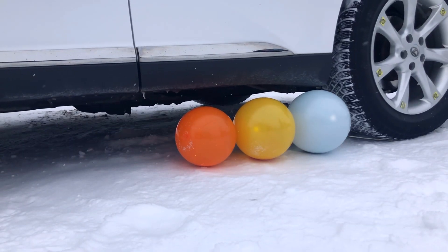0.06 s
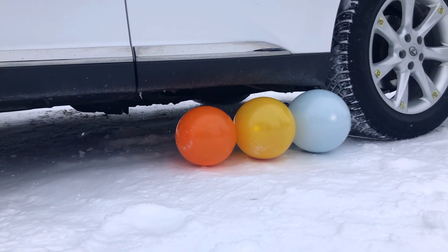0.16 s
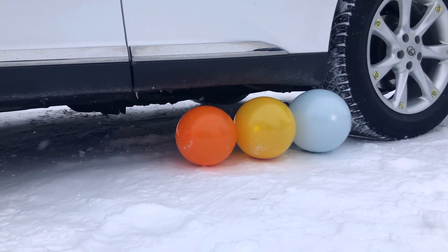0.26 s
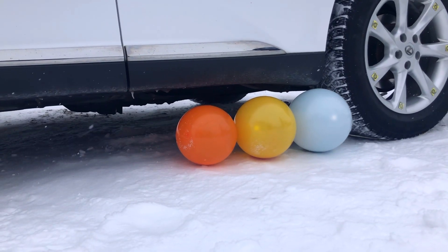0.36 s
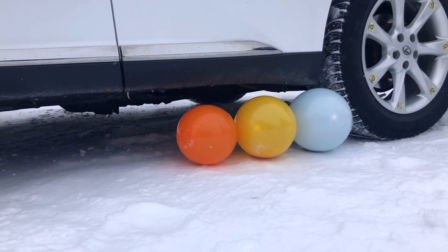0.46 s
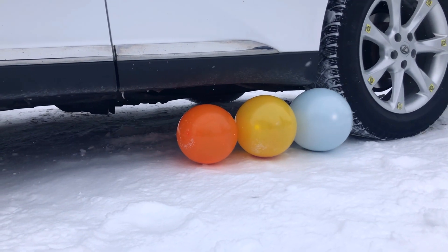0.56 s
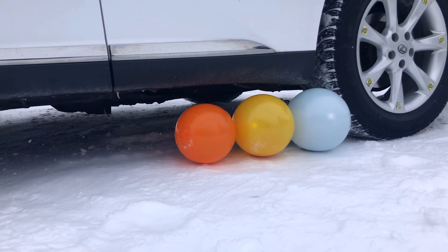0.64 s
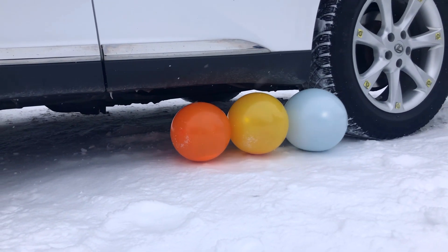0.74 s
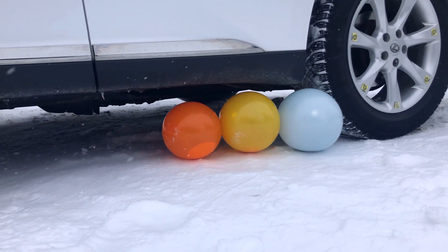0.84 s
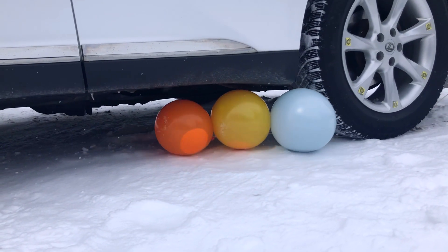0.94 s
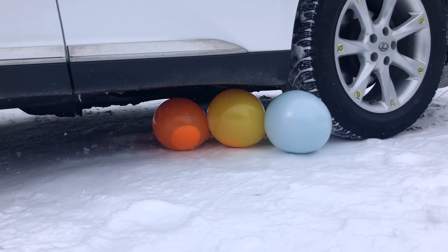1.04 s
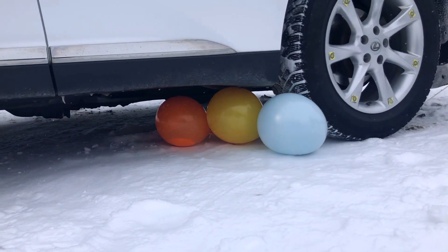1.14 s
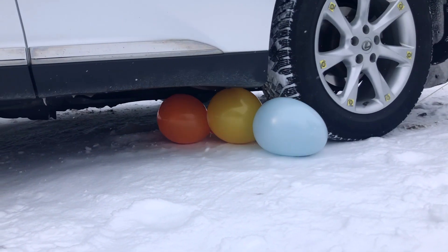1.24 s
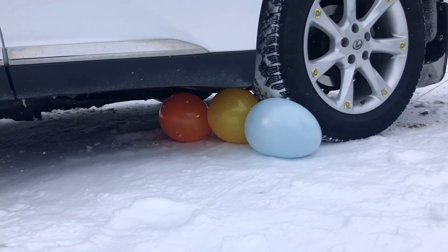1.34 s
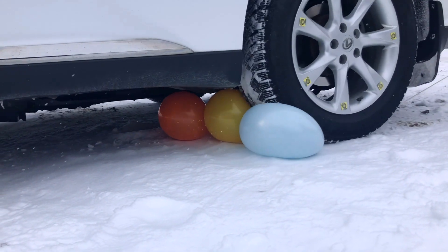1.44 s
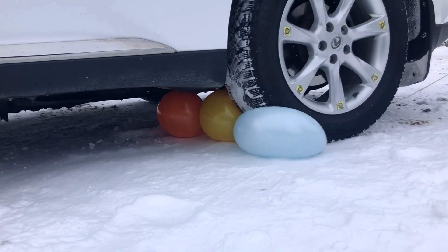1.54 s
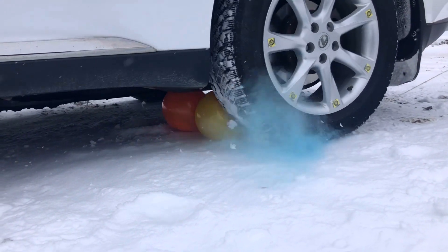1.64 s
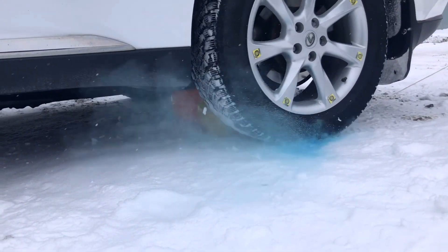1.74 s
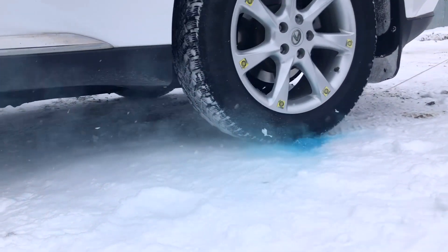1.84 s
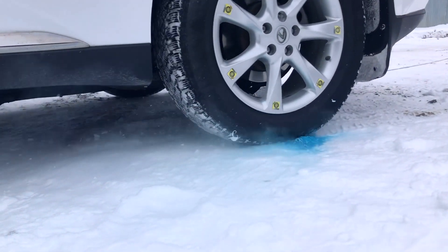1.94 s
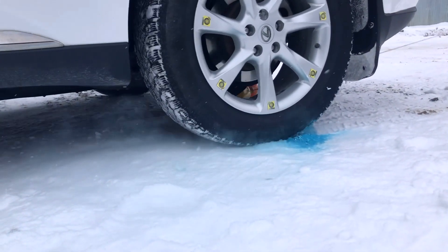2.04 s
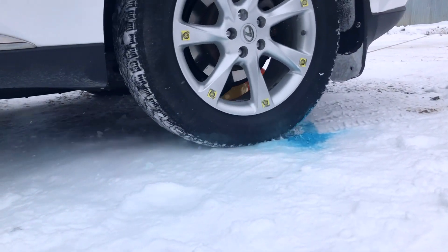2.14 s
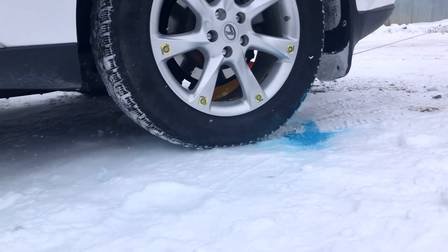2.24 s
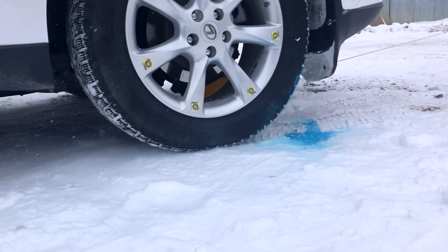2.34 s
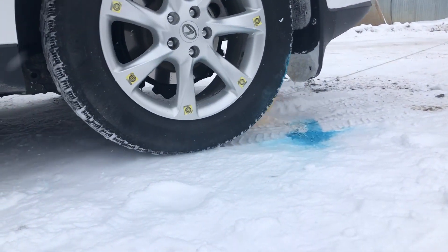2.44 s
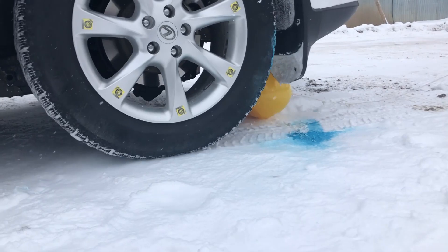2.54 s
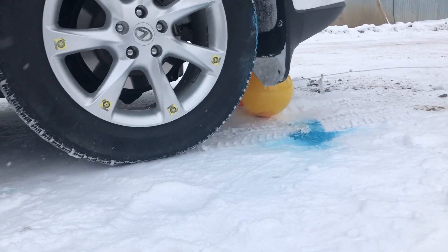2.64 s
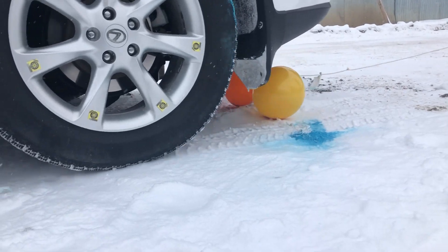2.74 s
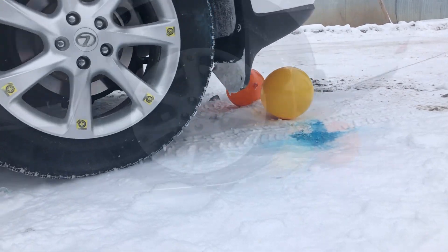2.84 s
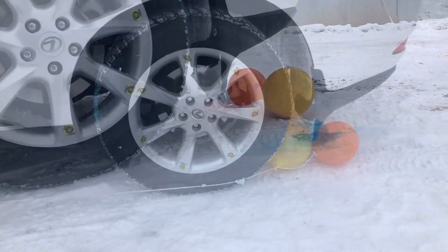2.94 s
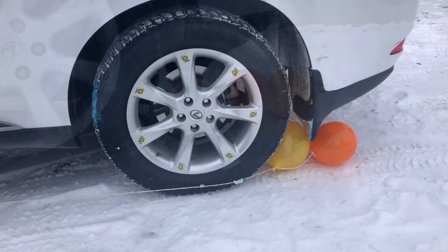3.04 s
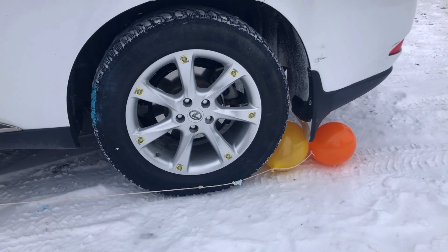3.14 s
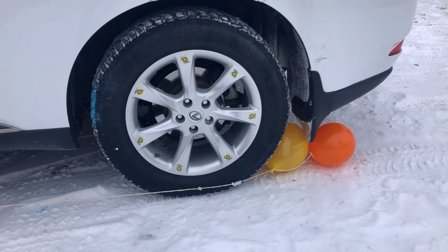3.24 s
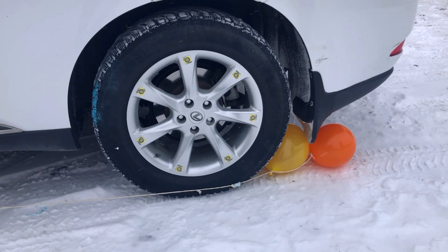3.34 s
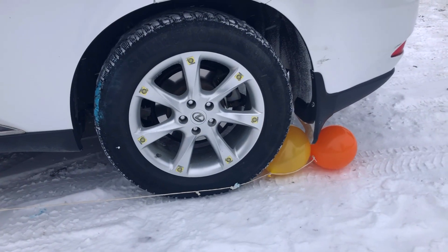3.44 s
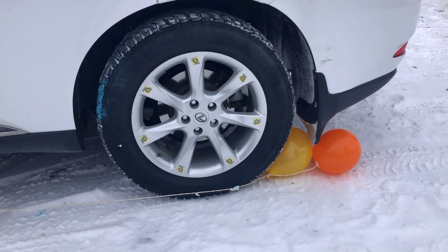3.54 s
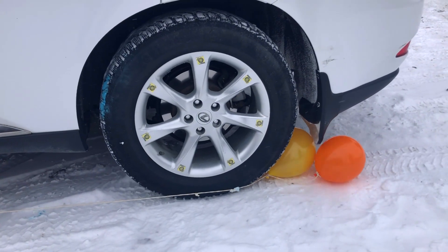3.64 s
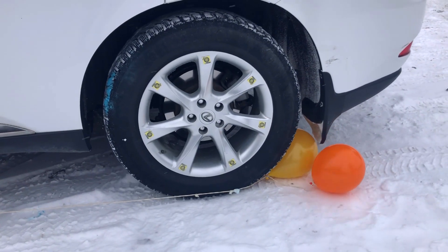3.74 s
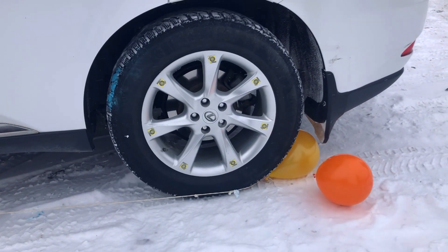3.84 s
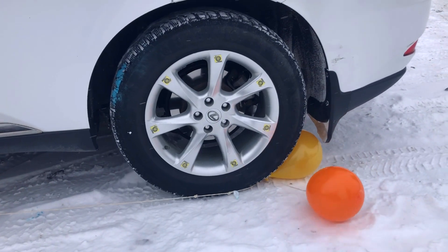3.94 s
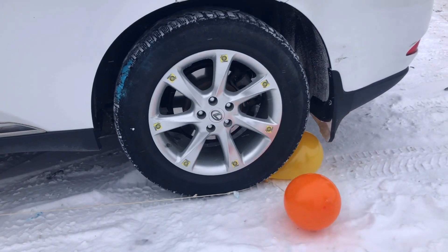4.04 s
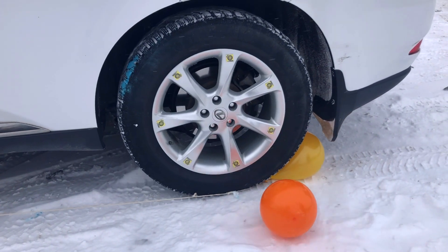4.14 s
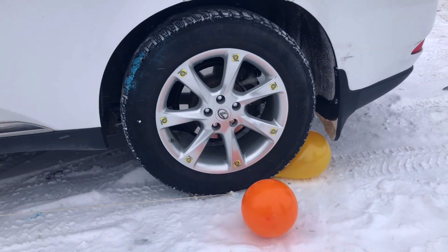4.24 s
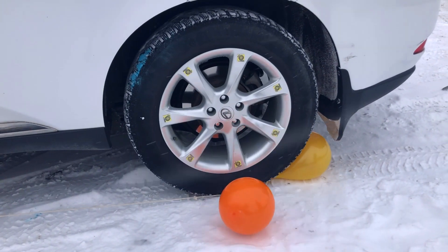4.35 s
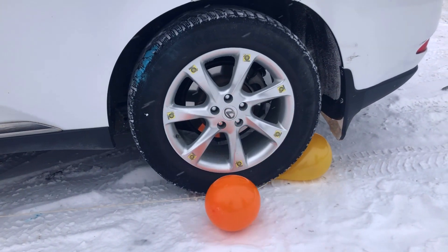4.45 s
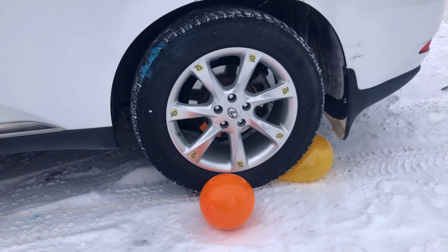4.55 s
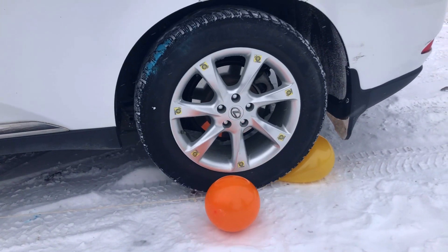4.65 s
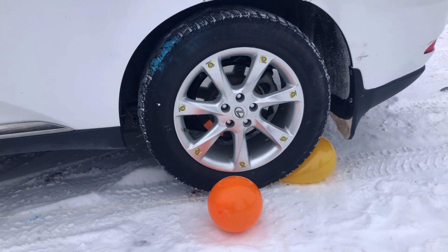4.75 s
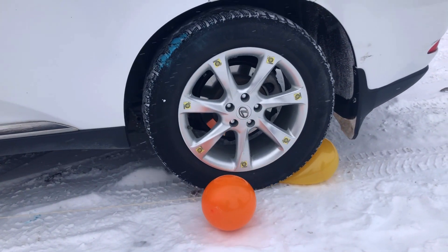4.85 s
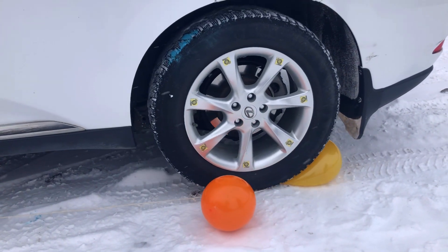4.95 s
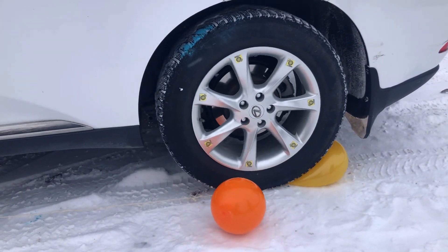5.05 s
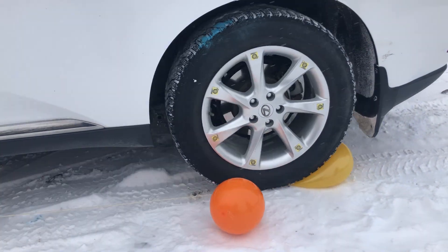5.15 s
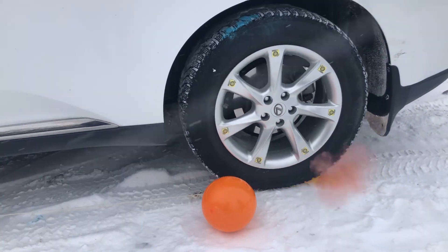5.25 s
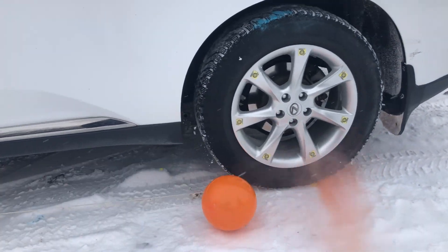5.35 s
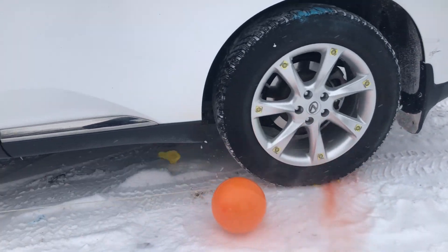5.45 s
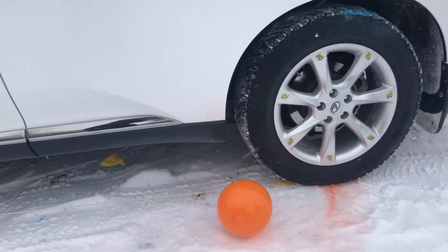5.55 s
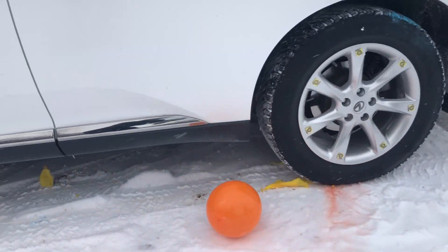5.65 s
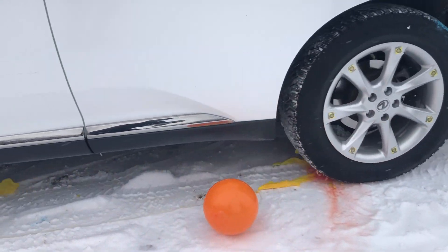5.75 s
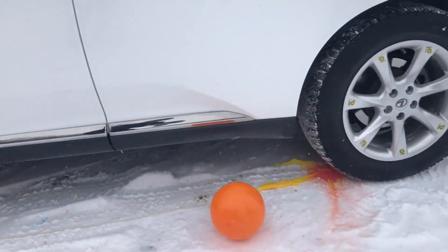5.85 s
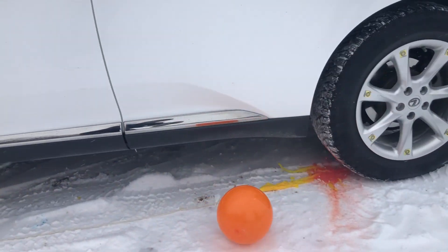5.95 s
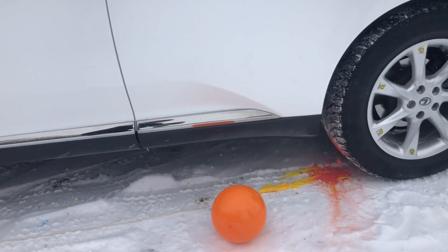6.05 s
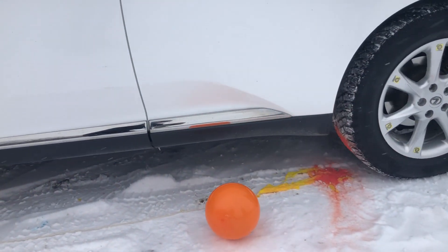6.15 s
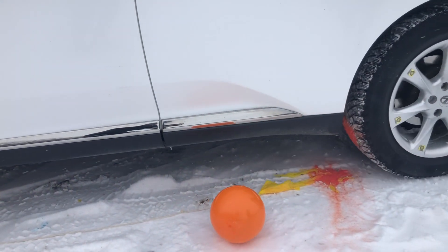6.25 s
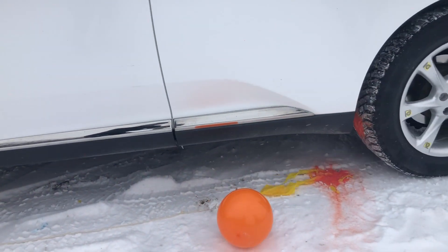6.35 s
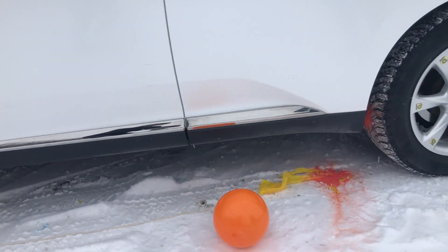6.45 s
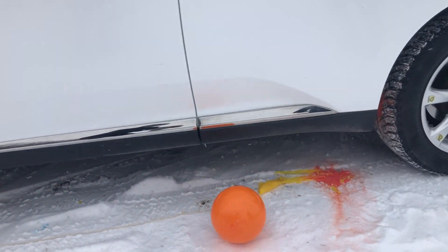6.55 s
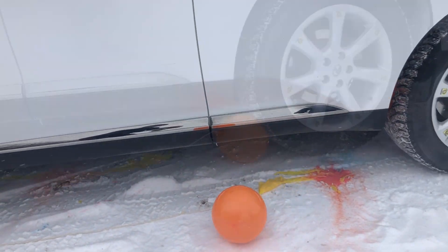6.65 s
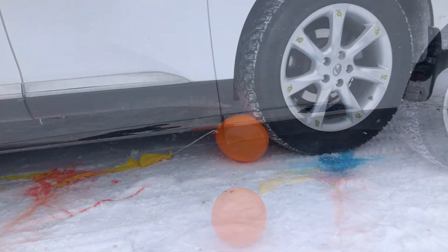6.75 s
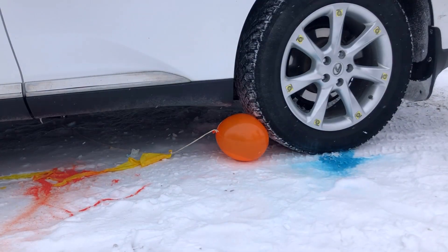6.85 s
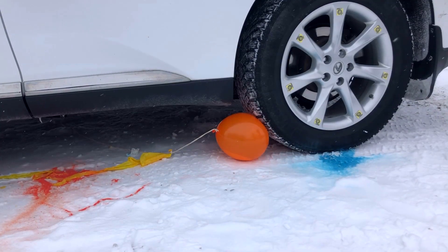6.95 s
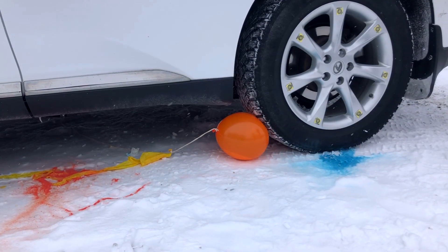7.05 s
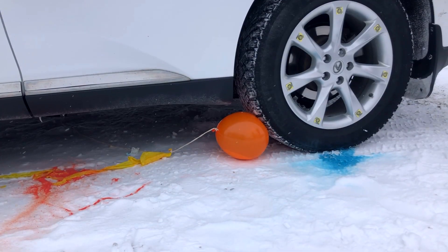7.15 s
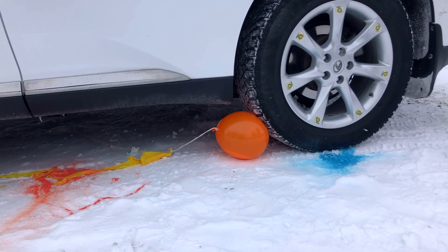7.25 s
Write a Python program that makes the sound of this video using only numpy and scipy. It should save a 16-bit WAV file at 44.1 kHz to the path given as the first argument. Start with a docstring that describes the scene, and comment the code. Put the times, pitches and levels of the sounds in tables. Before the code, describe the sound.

Close outdoor sound of a car tyre rolling slowly over packed snow, with low rumble and grainy crunches. Balloons burst in a tight run of sharp, hollow booms with slapping rubber and a brief squeal. A quiet engine hum follows, then the tyre lurches with thumps and ticking studs, and two more loud bursts crack, slightly overloaded. It ends on faint crunching and soft idling.

```python
"""Balloons burst under the tyre of a car rolling slowly over packed snow, out in the open. Each burst is a
falling boom with a crack of filtered noise; slapping, squeaking and squealing rubber joins in. Around the tyre,
snow crunches and thumps as falling rings, studs tick in short noise and metal clinks in modes. Behind it lie
snow grains, rumble and hiss of shaped noise, and an engine idling in wavering sines. The whole sound fades out
and in briefly at five moments and fades out at its very end; the loudest bursts are softly overloaded."""
import sys
import numpy as np
from scipy import signal
from scipy.fft import rfft, irfft, next_fast_len
from scipy.io import wavfile
from scipy.ndimage import uniform_filter1d

SR = 44100
rng = np.random.default_rng(int(sys.argv[2]) if len(sys.argv) > 2 else 0)


def dump_mix(stems):
    """Bounce the given channels to the path in sys.argv[1] as a 16-bit WAV at rate SR."""
    frames = np.atleast_2d(stems).T  # one column per channel
    limited = np.clip(frames, -1, 1)  # hard clip at full scale
    pcm = np.round(limited * 32767).astype(np.int16)
    wavfile.write(sys.argv[1], SR, pcm)


N = 321753
T = np.arange(N) / SR  # seconds


def gain_of(db):
    """Decibels to amplitude."""
    return 10 ** (np.asarray(db) / 20)


def evened(x):
    """Scales to rms 1."""
    return x / np.sqrt(np.mean(x ** 2) + 1e-20)


def wander(size):
    """Slow random drift of rms 1: noise averaged over size samples."""
    return evened(uniform_filter1d(rng.standard_normal(N), size=size))


def along(rows):
    """The columns of a curve, interpolated at every sample."""
    s, *columns = np.transpose(rows)
    return [np.interp(T, s, c) for c in columns]


def colour(x, points):
    """Filters x by a spectrum of (Hz, dB) points, rms 1."""
    hz, db = np.transpose(points)
    size = next_fast_len(N)
    log_hz = np.log(np.fft.rfftfreq(size, 1 / SR) + 1)
    response = gain_of(np.interp(log_hz, np.log(hz + 1), db, -90, -90))
    return evened(irfft(rfft(x, size) * response, size)[:N])


def band(x, low_hz, high_hz):
    """Band-pass of rms 1."""
    edges = [low_hz, min(high_hz, 20000)]
    sos = signal.butter(N=2, Wn=edges, btype="band", fs=SR, output="sos")
    return evened(signal.sosfilt(sos, x))


def add(mix, s, sound):
    """Mixes a sound in at s seconds."""
    part = mix[round(s * SR):][:len(sound)]
    part += sound[:len(part)]


def chirp(start_hz, end_hz, glide, t60, rise, hold=1):
    """A dying ring, peak 1, whose pitch drops as the struck thing slackens; times in seconds."""
    t = np.arange(int(t60 * SR) + 8) / SR
    hz = end_hz + (start_hz - end_hz) * np.exp(-t / glide)
    decay = gain_of(-60 * (t / t60) ** hold)  # hold above 1 keeps it loud, then cuts it short
    ring = np.sin(2 * np.pi * np.cumsum(hz) / SR) * decay * (1 - np.exp(-t / rise))
    return ring / abs(ring).max()


# The engine idling. Each row: time in seconds, firing rate in Hz, level in dB before the order levels.
IDLE_CURVE = [(2.75, 30.26, -58), (3.0, 30.34, -41.5), (4.2, 29.61, -44), (4.65, 28.77, -42.5),
              (4.8, 29.78, -69), (6.601, 27.67, -75), (6.9, 26.76, -47), (7.3, 27, -43.5)]
# Its audible orders. Each row: multiple of the firing rate, level in dB relative to the idle.
ENGINE_ORDERS = [(2, -5.5), (4, -5), (4.5, -8.5), (5, 1.5)]
# Steady thin tones of the accessories. Each row: start and end in seconds, pitch in Hz, level in dB.
ACCESSORY_WHINES = [(2.9, 4.6, 890, -63), (2.9, 4.6, 1440, -59), (2.9, 4.6, 2028, -64.5),
                    (2.9, 4.2, 9400, -72), (0, .35, 9550, -75)]


def engine():
    """Wavering multiples of the firing rate and the thin whines of the accessories."""
    firing_hz, idle_db = along(IDLE_CURVE)
    turns = np.cumsum(firing_hz) / SR
    out = np.zeros(N)
    for multiple, order_db in ENGINE_ORDERS:
        waver_db = 2.3 * wander(5000)
        tone = np.sin(2 * np.pi * (multiple * turns + rng.random()))
        out += gain_of(idle_db + order_db + waver_db) * tone
    for start, end, hz, db in ACCESSORY_WHINES:
        drift = np.cumsum(rng.standard_normal(N)) * .009  # turns
        on = np.clip(np.minimum(T - start, end - T) / 0.27 + .5, 0, 1)  # fades over 0.27 s
        out += gain_of(db) * on * np.sin(2 * np.pi * (hz * T + drift))
    return out


# Level of the engine hiss. Each row: time in seconds, level in dB before brightening,
# gain in dB of its treble, roughly above 5 kHz.
HISS_CURVE = [(0, -53.5, -8), (.6, -52.5, -13), (.62, -63.5, 16.5), (1.2, -63, 25), (1.4, -68, 30),
              (1.64, -53, 25.5), (1.75, -55, 5), (1.8, -46.5, -15.5), (2.0, -63.5, -13.5),
              (2.4, -64.5, 1.5), (2.9, -54.5, -10.5), (3.3, -50, -8.5), (4.75, -50.5, -5.5),
              (4.95, -61, -1), (5.15, -53.5, -7), (5.25, -56.5, 2), (5.37, -55.5, -6), (5.4, -62.5, 16.5),
              (5.55, -73.5, -14), (6.65, -66.5, -5), (6.67, -56, -31.5), (7.3, -57.5, -36)]
# Tone of the engine hiss. Each row: frequency in Hz, relative level per Hz in dB.
HISS_SPECTRUM = [(710, -21.5), (1200, -2), (1460, -1), (1820, -7), (1970, -9), (2290, -6.5), (15100, -25),
                 (15800, -30), (16100, -71)]


def engine_hiss():
    """Shaped noise whose level flickers and whose treble is raised or lowered apart."""
    level_db, bright_db = along(HISS_CURVE)
    hiss = colour(rng.standard_normal(N), HISS_SPECTRUM) * gain_of(wander(1200))
    treble = hiss - signal.lfilter([.5], [1, -.5], hiss)
    return gain_of(level_db) * (hiss + (gain_of(bright_db) - 1) * treble)


# Share of separate grains in the snow sound. Each row: time in seconds, share by power from 0 to 1.
GRAIN_SHARE = [(0, 0.65), (.7, .7), (1.9, 0.3), (2.85, 0.7), (3.1, 0.28), (4.6, 0.05), (4.8, 0.45),
               (5.7, .55), (6.75, 0.75), (6.95, 0.35)]
# Tone of the snow under the tyre. Each row: frequency in Hz, relative level per Hz in dB.
SNOW_SPECTRUM = [(76, -26), (130, -12.5), (421, -12), (717, -18), (842, -20), (1110, -23.5), (1600, -30.5),
                 (2000, -37), (3250, -87)]


def snow_grains():
    """Crystal bonds snap with falling pitches among smooth noise, shaped to the tone of snow."""
    strengths = gain_of(3.4 * np.minimum(rng.exponential(1, N), 3))
    snaps = strengths * (rng.random(N) < 400 / SR)  # about 400 a second
    kind, grains = rng.integers(0, 12, N), np.zeros(N)
    for k, hz in enumerate(np.geomspace(200, 1100, num=12)):
        snap = chirp(1.21 * hz, hz, 0.002, 9 / hz, 0.0021)
        grains += signal.oaconvolve(snaps * (kind == k), snap)[:N]
    # flatten the grains' own spectrum before colouring them
    power = uniform_filter1d(abs(rfft(grains)) ** 2, size=400)
    grains = irfft(rfft(grains) / np.sqrt(power + 1e-9), N)
    share = np.clip(along(GRAIN_SHARE)[0], 0, 1)
    smooth = colour(rng.standard_normal(N), SNOW_SPECTRUM)
    return np.sqrt(share) * colour(grains, SNOW_SPECTRUM) + np.sqrt(1 - share) * smooth


# The rolling tyre between lurches. Each row: time in seconds, snow level in dB, rumble level in dB.
ROLL_CURVE = [(0, -64.5, -30.5), (.07, -41.5, -42.5), (.12, -38, -34), (.3, -32.5, -35.5), (.6, -39.5, -38),
              (1.14, -37, -40), (1.2, -40, -44), (1.32, -36.5, -38), (1.45, -34.5, -28.5),
              (1.7, -30, -26.5), (1.77, -51, -45), (2.0, -48, -63), (2.45, -46.5, -58), (2.65, -44, -48.5),
              (2.95, -40.5, -48), (3.2, -46.5, -44), (4.62, -45, -49), (4.9, -42, -31), (5.2, -41, -29.5),
              (5.36, -36, -31.5), (5.57, -52, -48), (6.2, -49, -43), (6.5, -40.5, -36.5), (6.83, -43, -39),
              (6.92, -51, -46), (7.3, -52, -41.5)]
# The tyre lurching over a ridge of snow. Each row: time of the peak in seconds, length in seconds,
# change of the snow level in dB, change of the rumble level in dB.
RIDGE_LURCHES = [(2.307, 0.14, 4.5, -0.5), (2.793, 0.056, 4, -5), (3.274, 0.055, 4, 12.5),
                 (4.73, 0.16, 4.5, 17), (4.938, 0.092, 0.5, 4), (5.3, 0.23, 6.5, 8.5), (5.501, 0.092, 6, 4),
                 (5.878, 0.28, 3.5, 7)]
# Tone of the rumble. Each row: frequency in Hz, relative level per Hz in dB.
RUMBLE_SPECTRUM = [(20, -22.5), (40, 5), (80, 8), (134, 7.5), (206, 3), (320, -6), (420, -40)]


def rolling():
    """Snow grains and low rumble change level as the tyre lurches and as its tread rides unevenly."""
    snow_db, rumble_db = along(ROLL_CURVE)
    for s, length, crush_db, boom_db in RIDGE_LURCHES:
        swell = np.interp(T, [s - length / 2, s, s + length / 2], [0, 1, 0])
        snow_db = snow_db + crush_db * swell
        rumble_db = rumble_db + boom_db * swell
    uneven = evened(uniform_filter1d(wander(900), size=900))
    lumps = gain_of(2.44 * uneven)
    rumble = evened(colour(rng.standard_normal(N), RUMBLE_SPECTRUM) * lumps)
    return gain_of(snow_db) * snow_grains() * lumps ** 0.54 + gain_of(rumble_db) * rumble


# A small piece of metal struck. Each row: start in seconds, peak level in dB.
METAL_TAPS = [(0.041, -37), (0.078, -29.5)]
# Modes of the metal. Each row: frequency in Hz, relative level in dB, 60 dB decay in seconds.
METAL_MODES = [(1860, -12, 0.041), (2280, -3.5, 0.033), (3180, -2.5, 0.032), (4440, -1.5, 0.012)]


def clinks():
    """Two light taps ring the same few modes."""
    out, t = np.zeros(N), np.arange(4000) / SR
    ring = sum(gain_of(db - 60 * t / t60) * np.sin(2 * np.pi * hz * t) for hz, db, t60 in METAL_MODES)
    for s, db in METAL_TAPS:
        add(out, s, gain_of(db) * ring / abs(ring).max())
    return out


# Studs meeting ice. Each row: start in seconds, peak level in dB.
STUD_TICKS = [(0.043, -40), (0.08, -39), (1.534, -29), (1.547, -14.5), (4.815, -40), (4.8628, -51),
              (4.906, -46), (4.94, -35.5), (5.01, -31), (5.029, -41), (5.0474, -26), (5.131, -30.5),
              (5.1866, -55), (5.221, -52), (5.261, -43), (5.395, -36.5), (5.7695, -55), (5.7983, -53.5),
              (5.8157, -50), (5.823, -57.5), (5.967, -54), (6.0294, -50), (6.1056, -53), (6.141, -51),
              (6.161, -55), (6.178, -52.5), (6.246, -49), (6.3366, -64), (6.36, -57), (6.3734, -50.5),
              (6.388, -51), (6.441, -50.5), (6.478, -50.5), (6.487, -53.5), (6.5405, -50), (6.62, -54)]
# Further studs at random. Each row: time in seconds, typical peak level in dB.
STUD_PATTER = [(4.75, -92), (4.9, -42.5), (5.5, -53), (5.7, -68), (6.1, -65), (6.6, -56), (6.7, -88.5)]


def studs():
    """Short treble ticks: the listed ones on time, others scattered at random in clumps."""
    out, t = np.zeros(N), np.arange(400) / SR
    shape = t * np.exp(-t / 0.0002)
    ticks = [shape * band(rng.standard_normal(400), 2800, 11500) for _ in range(56)]
    ticks = [tick / abs(tick).max() for tick in ticks]
    for (s, db), tick in zip(STUD_TICKS, ticks):
        add(out, s, gain_of(db) * tick)
    clumps = gain_of(6 * wander(1500))
    hits = rng.random(N) < 90 * clumps / SR  # 90 a second, thickened and thinned by the clumps
    patter = gain_of(along(STUD_PATTER)[0] + 3.5 * rng.standard_normal(N)) * hits
    kind = rng.integers(0, 8, N)  # the last eight ticks serve the patter
    return out + sum(signal.oaconvolve(patter * (kind == k), ticks[-1 - k])[:N] for k in range(8))


# Lumps of snow giving way. Each row: start in seconds, peak level in dB,
# nominal pitch in Hz that the fall passes through.
SNOW_CRUNCHES = [(0.249, -29, 563), (0.261, -32, 645), (0.287, -38, 405), (0.312, -21, 390),
                 (0.387, -20, 520), (0.443, -26, 487), (0.456, -21.5, 634), (0.572, -29, 600),
                 (0.603, -28.5, 533), (0.682, -24.5, 410), (0.842, -22, 382), (1.048, -19.5, 410),
                 (1.099, -25.5, 400), (1.193, -23.5, 480), (2.514, -32, 416), (2.555, -34.5, 459),
                 (2.782, -30.5, 660), (2.842, -30.5, 430), (3.272, -31, 420), (4.28, -33, 850),
                 (4.708, -33, 392), (4.77, -21, 328), (5.001, -37, 700), (5.11, -29, 590),
                 (5.266, -31, 520), (5.303, -19.5, 597)]
# The tyre dropping through the crust. Each row: start in seconds, peak level in dB,
# nominal pitch in Hz that the fall passes through.
CRUST_THUMPS = [(1.126, -25.5, 181), (4.715, -22.5, 139), (4.736, -17, 160), (4.968, -20, 97),
                (5.212, -21.5, 142), (5.26, -23, 115.5), (6.24, -23.5, 89.8), (6.288, -26.5, 126),
                (6.453, -25.5, 122), (6.511, -27.5, 105), (6.604, -23, 151), (6.628, -21.5, 104)]
# The tyre scuffing sideways. Each row: start in seconds, length in seconds, level in dB before the swell.
TYRE_SCRAPES = [(5.815, .12, -56)]


def tread():
    """Crunches and thumps are falling rings as snow gives way; scrapes are swelling bands of sparse grit."""
    out = np.zeros(N)
    for s, db, hz in SNOW_CRUNCHES:
        add(out, s, gain_of(db) * chirp(2.93 * hz, 0.66 * hz, 0.0012, 11 / hz, 0.00098))
    for s, db, hz in CRUST_THUMPS:
        add(out, s, gain_of(db) * chirp(2.52 * hz, 0.73 * hz, 0.0031, 8 / hz, 0.00051))
    low_hz, high_hz = 1180, 1960
    for s, length, db in TYRE_SCRAPES:
        grit = rng.standard_normal(12000) * (rng.random(12000) < .02)
        scuff = band(band(grit, low_hz, high_hz), low_hz, high_hz)[:round(length * SR)]
        add(out, s, gain_of(db) * scuff * np.hanning(len(scuff)))
    return out


# A burst skin dragged under the tread while a loose flap of it beats. Each row: time in seconds,
# mean slip rate in Hz, level in dB of the tone before the flap, flap rate in Hz, flap depth from 0 to 1.
SQUEAL_CURVE = [(1.758, 790, -54, 640, 1), (1.778, 850, -34, 530, 1), (1.795, 820, -29, 470, .9),
                (1.812, 795, -29, 280, 1), (1.825, 755, -34, 250, .6), (1.843, 805, -34.5, 200, .15),
                (1.853, 795, -46, 200, .15), (1.869, 792, -34.5, 230, .1), (1.893, 780, -56, 260, .1)]


def squeal():
    """Slips with uneven timing, beaten by the flap into sidebands, with a rasp as long as the flap is loose."""
    start, end = SQUEAL_CURVE[0][0], SQUEAL_CURVE[-1][0]
    span = slice(round(start * SR), round(end * SR))
    hz, db, flap_hz, depth = (c[span] for c in along(SQUEAL_CURVE))
    noise = rng.standard_normal((2, len(hz)))
    uneven = evened(uniform_filter1d(noise[0], size=150))
    turns = np.cumsum(hz * (1 + .05 * depth * uneven)) / SR
    flap = np.sin(2 * np.pi * np.cumsum(flap_hz) / SR)
    tone = evened(sum(np.sin(2 * np.pi * k * turns) / k ** 1.7 for k in range(1, 8)))
    rasp = band(noise[1], 250, 1500) + .35 * band(noise[1], 1500, 4500)
    loose = tone * flap + gain_of(1) * flap + gain_of(-8) * rasp
    return start, gain_of(db) * (tone + depth * loose)


# Rubber sticking and slipping. Each row: start in seconds, length in seconds, level in dB at the swell's top,
# slip rate at the start and at the end in Hz, roughness from 0 to 1, frequency in Hz above which it is dull.
RUBBER_SQUEAKS = [(.915, .026, -27, 532, 530, .02, 600), (1.226, .03, -22, 262, 288, .04, 640),
                  (5.408, .035, -48, 2150, 1950, .6, 2000), (6.83, .18, -57, 1960, 1820, .45, 2000)]


def squeaks():
    """Regular slips give a harmonic tone; rough ones smear it into a rasp."""
    out = np.zeros(N)
    for s, length, peak_db, from_hz, to_hz, rough, dull_hz in RUBBER_SQUEAKS:
        done = np.arange(0, 1, 1 / (length * SR))
        db = peak_db - 27 * (2 * done ** 0.86 - 1) ** 2  # swells a little before the middle
        hz = from_hz + (to_hz - from_hz) * done
        turns = np.cumsum(hz) / SR
        tone = sum(np.sin(2 * np.pi * k * turns) / (1 + (k * hz / dull_hz) ** 6) for k in range(1, 8))
        noise = rng.standard_normal(8000)[:len(done)]
        rasp = band(noise, 0.85 * to_hz, 1.1 * from_hz)
        rough = np.clip(rough, 0, 1)
        add(out, s, gain_of(db) * (np.sqrt(1 - rough) * evened(tone) + np.sqrt(rough) * evened(rasp)))
    return out


def boom(s, db, end_hz, ring):
    """A falling ring of released air, torn ragged by noise; returns its start and sound."""
    ragged = band(rng.standard_normal(8000), 0.2 * end_hz, 1.4 * end_hz)[:len(ring)]
    return s, gain_of(db) * ring * (1 + 0.3 * ragged)


# Dull slaps of rubber around the bursts. Each row: start in seconds, level in dB before raggedness,
# end pitch in Hz, 60 dB decay in seconds.
RUBBER_SLAPS = [(1.358, -31, 326, 0.0068), (1.3617, -10.5, 384, 0.0076), (1.3675, -7, 264, 0.015),
                (1.381, -17, 98, 0.043), (1.6579, -2.5, 193, 0.012), (1.664, -15, 100, 0.019),
                (5.059, -9, 224, 0.0074), (5.066, -16, 459, 0.013), (5.0725, -6, 116.5, 0.02),
                (5.3042, -9, 149, 0.021), (5.35, -27, 466, 0.042)]


def slaps():
    """Booms alone, each falling from twice its end pitch."""
    out = np.zeros(N)
    for s, db, hz, t60 in RUBBER_SLAPS:
        ring = chirp(2 * hz, hz, glide=0.0044, t60=t60, rise=0.00078, hold=2.6)
        add(out, *boom(s, db, hz, ring))
    return out


# The skin tearing further. Each row: start in seconds, level in dB before its decay.
SKIN_RIPS = [(1.3503, -21.5), (1.355, -27.5), (1.3715, -28)]


def rips():
    """Tearing rubber as decaying bands of noise."""
    out, t = np.zeros(N), np.arange(3000) / SR
    for s, db in SKIN_RIPS:
        decay = gain_of(db - 60 * t / 0.022)
        add(out, s, decay * band(rng.standard_normal(len(t)), 900, 5100) * np.minimum(t / 0.00044, 1))
    return out


# The balloons bursting. Each row: start in seconds, boom level in dB before raggedness,
# boom start and end pitch in Hz, glide in seconds, 60 dB decay in seconds, rise in seconds,
# crack level in dB, crack decay in seconds, crack band from and to in Hz,
# treble level in dB, treble decay in seconds, treble upper edge in Hz.
BALLOON_BURSTS = [(1.3476, -2, 724, 446, 0.00082, 0.0064, 0.0055, -16, 0.062, 704, 1660, -31.5, 0.12, 12000),
                  (1.558, -11.5, 1630, 350, 0.0012, 0.0098, 0.00083, -11, 0.016, 900, 3220, -6, 0.0055, 13400),
                  (1.6544, -6.5, 1880, 597, 0.0013, 0.0044, 0.00095, -9, 0.04, 810, 4000, -11.5, 0.021, 11900),
                  (5.0574, -6, 1130, 689, 0.0012, 0.0068, 0.0007, -4, 0.018, 1025, 1550, -18, 0.023, 2900),
                  (5.3255, 0, 2230, 377, 0.0012, 0.0093, 0.00043, -9.5, 0.015, 1212, 3020, -20, 0.023, 8100)]


def bursts():
    """A falling boom of released air, with a snap, a crack and treble from the tearing rubber."""
    out, t = np.zeros(N), np.arange(3000) / SR
    for s, db, start_hz, end_hz, glide, t60, rise, *tear in BALLOON_BURSTS:
        add(out, *boom(s, db, end_hz, chirp(start_hz, end_hz, glide, t60, rise, hold=4.4)))
        crack_db, crack_t60, low_hz, high_hz, treble_db, treble_t60, top_hz = tear
        noise = rng.standard_normal((2, len(t)))
        crack = gain_of(crack_db - 60 * t / crack_t60) * band(band(noise[0], low_hz, high_hz), low_hz, high_hz)
        treble = gain_of(treble_db - 60 * t / treble_t60) * band(noise[1], 2300, top_hz)
        # the first rip rings briefly in the middle of the crack's band
        mid_hz = np.sqrt(low_hz * high_hz)
        snap = chirp(1.2 * mid_hz, mid_hz, glide=.001, t60=.0045, rise=.0002, hold=2)
        add(out, s, gain_of(crack_db - 6) * snap)
        add(out, s - .0002, (crack + treble) * (1 - np.exp(-t / 0.00037)))  # the tear leads the boom
    return out


def balloons():
    """The bursts with the slapping, tearing, squeaking and squealing of their rubber."""
    out = bursts() + slaps() + rips() + squeaks()
    add(out, *squeal())
    return out


def scene():
    """All sources; balloons and tread sounds come back dulled from the car's underside."""
    near = balloons() + tread()
    t = np.arange(6000) / SR
    echo = rng.standard_normal(6000) * gain_of(-60 * t / 0.045) * (t > .003)
    echo = signal.lfilter([.15], [1, -.85], echo)
    back = gain_of(-20.5) * signal.oaconvolve(near, echo / np.linalg.norm(echo))[:N]
    background = engine() + engine_hiss() + rolling()
    return (near + back + studs() + clinks() + background)[None]


# Brief fades of the whole sound, out and in again; the last row fades it out at its very end. # Each row:
# quietest moment in seconds, fade-out in seconds, fade-in in seconds, lowest gain in dB.
BRIEF_FADES = [(1.144, 0.0026, 0.11, -38), (1.977, 0.15, 0.0038, -35), (2.397, 0.05, 0.07, -35),
               (5.147, 0.006, 0.064, -19), (5.653, 0.081, 0.032, -34), (7.296, 0.0037, 0.0046, -30)]


def record(dry):
    """Brief fades out and in, then bass loss, soft overload and a steep low-pass at 16.5 kHz."""
    for s, out, back, depth_db in BRIEF_FADES:
        dry = dry * np.clip(np.maximum((s - T) / out, (T - s) / back), gain_of(depth_db), 1)
    bass_cut = signal.butter(N=2, Wn=40, btype="high", fs=SR, output="sos")
    dry = signal.sosfilt(bass_cut, dry)  # the microphone loses the deepest bass
    soft = 0.97 * np.tanh(dry / 1.035)
    low_pass = signal.firwin(511, 16500, window=("kaiser", 9), fs=SR)
    return signal.oaconvolve(soft, low_pass[None], "same")


dry = scene()
out = record(dry)
dump_mix(out)
```